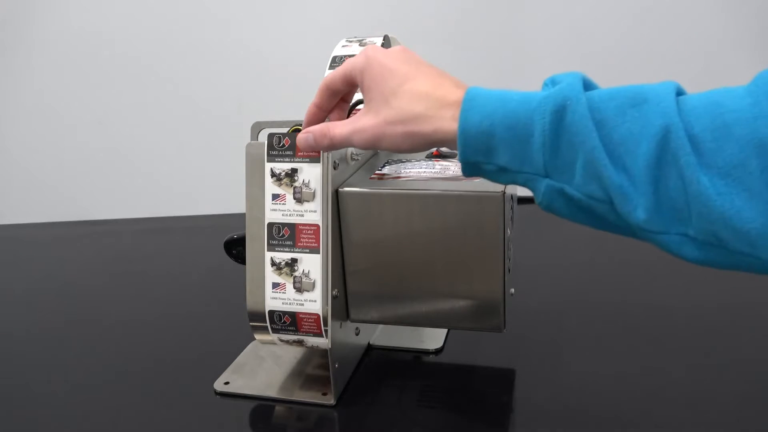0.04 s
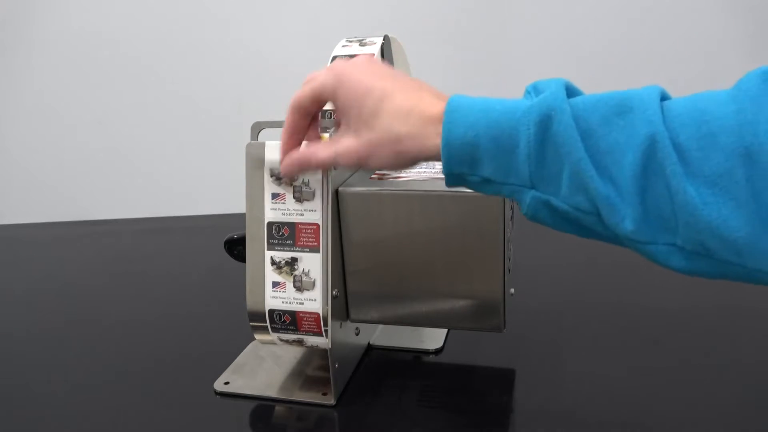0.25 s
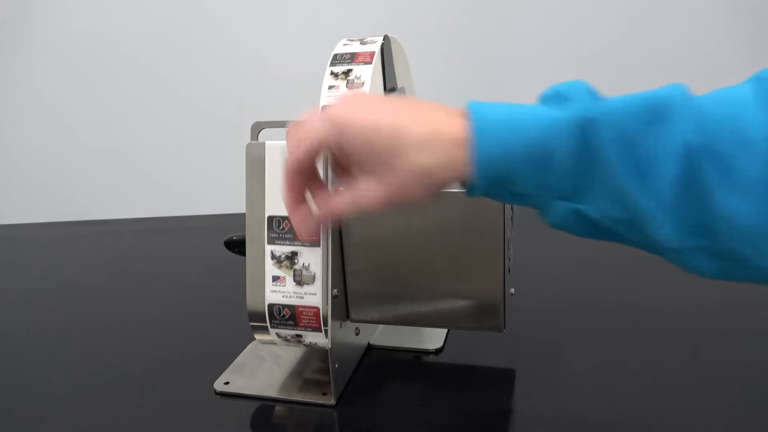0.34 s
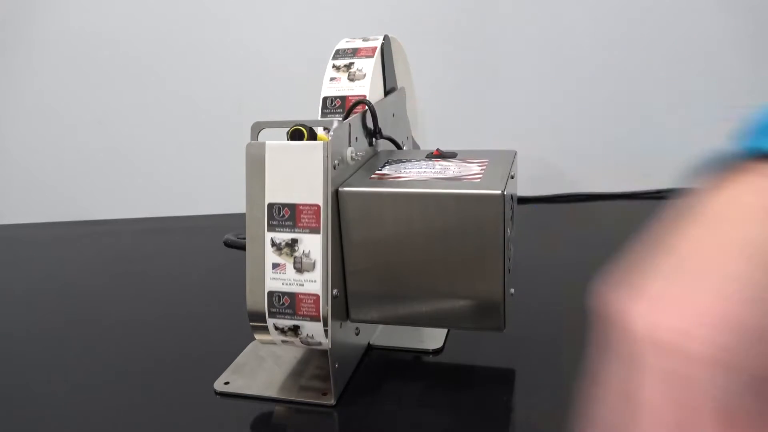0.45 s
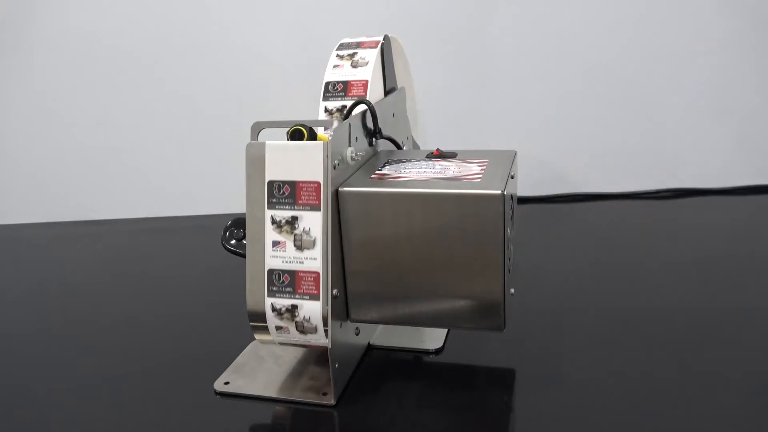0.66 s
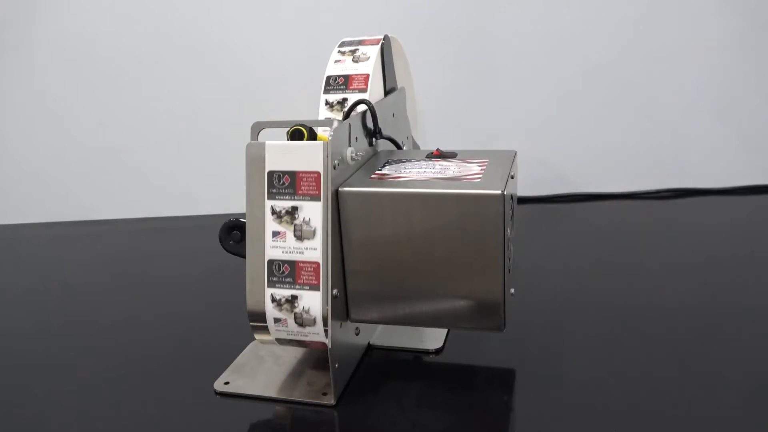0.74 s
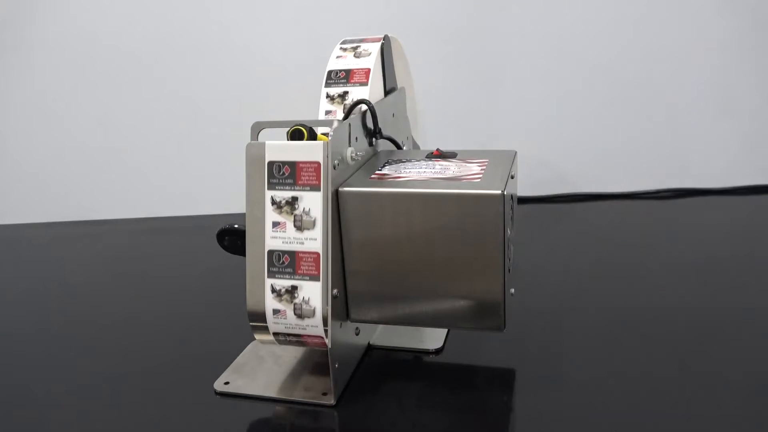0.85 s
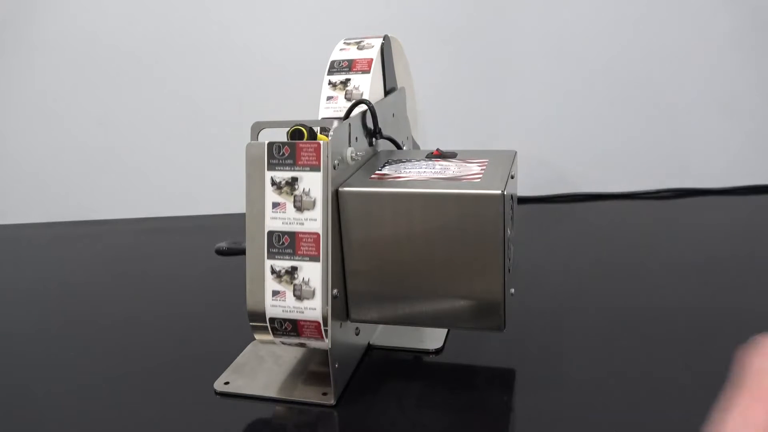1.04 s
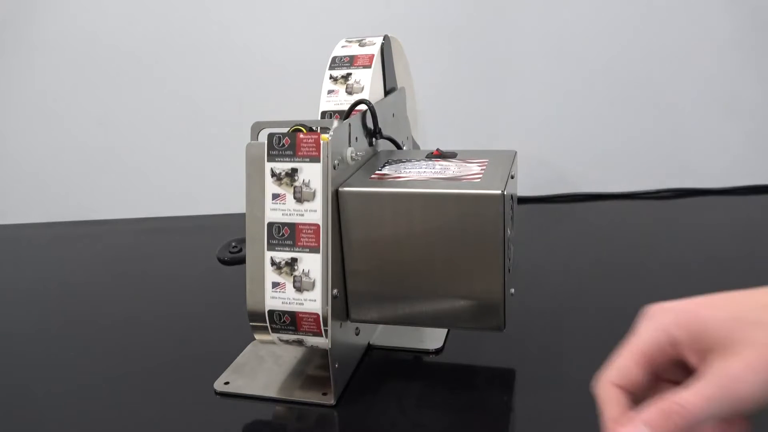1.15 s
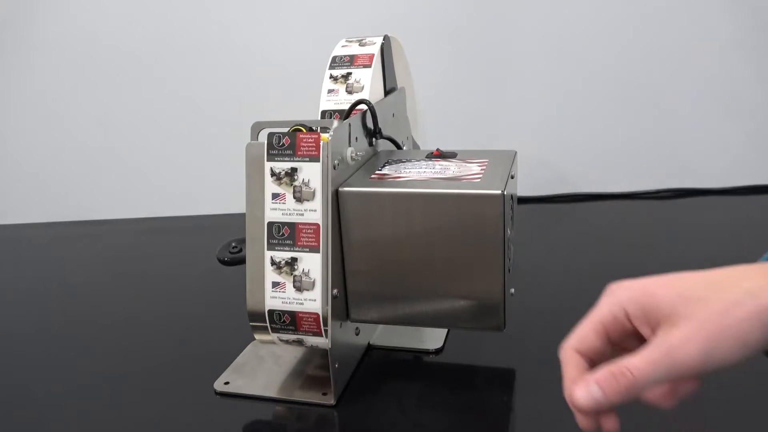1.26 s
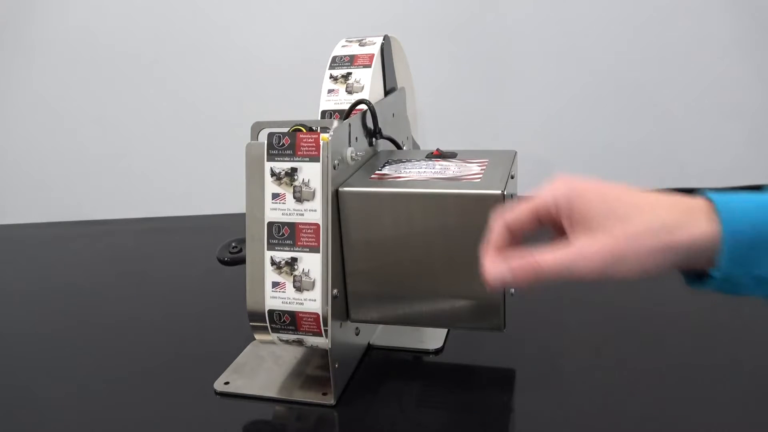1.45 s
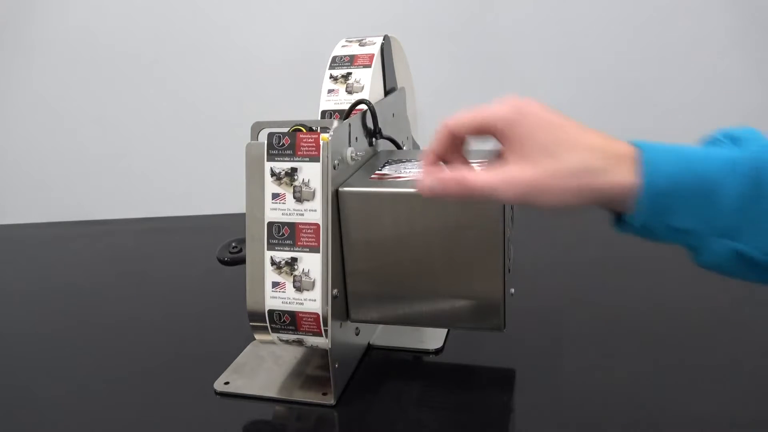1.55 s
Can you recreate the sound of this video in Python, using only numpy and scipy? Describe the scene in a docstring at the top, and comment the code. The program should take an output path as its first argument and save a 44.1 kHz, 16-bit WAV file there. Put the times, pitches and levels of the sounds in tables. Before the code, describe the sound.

In a quiet, slightly echoing room, a motorised label dispenser starts with a click, whirs with rapid ticking as it feeds the strip, then halts with a bouncing metallic clack. A sleeve rustles softly and a hand makes light ticks.

```python
"""A quiet, bare room with an electric label dispenser on a table.
A label is picked off, the mechanism clicks in and a small mains-powered gear motor whirs for
just under a second, ticking as it feeds the strip. It stops with a bouncing metal clack that
rings out in the room. A hand comes back with a sleeve rustle and a few light ticks."""
import sys
import numpy as np
from scipy import signal
from scipy.fft import rfft, irfft
from scipy.io import wavfile

SR = 44100
rng = np.random.default_rng(int(sys.argv[2]) if len(sys.argv) > 2 else 0)


def transcribe(signal):
    """Save signal, clipped to [-1, 1], as a 16-bit WAV file at the path in sys.argv[1]."""
    frames = np.atleast_2d(signal).T
    limited = np.clip(frames, -1, 1)
    pcm = np.round(limited * 32767).astype(np.int16)
    wavfile.write(sys.argv[1], SR, pcm)


N = 70560
T = np.arange(N) / SR

START_S, STOP_S = 0.219, 1.117  # the motor runs between these times
ROTOR_HZ, FIELD_HZ = 58.05, 120  # motor turns and magnetic pulses per second

# A fade time is how long a sound takes to drop 60 dB. A colour is its balance of lows and highs.
# how long the room echoes (frequency [Hz], fade time [s])
ROOM_FADE = [(150, 0.37), (400, 0.92), (1500, 0.68), (4500, 0.65), (8000, 0.4), (14000, 0.26)]
# stereo width (frequency [Hz], side level minus middle level [dB])
STEREO_WIDTH = [(60, -20), (220, -15.5), (450, -15), (800, -12), (1300, -23.5), (2400, -19.5),
                (4300, -20.5), (5800, -10), (8500, -7.5), (11000, -9.5), (11800, -38)]
# the room's quiet air (frequency [Hz], level [dB])
AIR_COLOUR = [(15, -16), (25, -11.5), (136, -9.5), (215, -14), (240, -15), (322, -7), (399, -15), (598, -8),
              (782, -15.5), (10900, -42.5), (15500, -39)]
# light ticks of the hand (time [s], level [dB], centre [Hz], drop away from the centre
# [dB per octave squared], fade time [s], left minus right [dB])
HAND_TICKS = [(0.045, -72.5, 6400, 26, 0.013, 0), (0.172, -70, 7000, 10, .03, -1),
              (1.3634, -29, 4850, 3.5, 0.003, -5.5), (1.4223, -37.5, 3160, 8, 0.013, -2),
              (1.4282, -42.5, 1480, 16, 0.019, 0.5), (1.4723, -48.5, 3080, 3.5, 0.023, -4),
              (1.479, -63, 10000, -1.5, 0.016, 0)]
# the broad noise under each of those ticks (frequency [Hz], level [dB])
TICK_BASE_COLOUR = [(200, -16), (600, -12.5), (7000, -15), (15000, -31)]
# how the sleeve rustle comes and goes (time [s], level [dB])
SLEEVE_LEVELS = [(.16, -100), (.18, -78.5), (.22, -70), (.3, -100), (1.28, -65), (1.35, -63), (1.41, -76),
                 (1.48, -59), (1.53, -68.5), (1.6, -78)]
# rustling cloth (frequency [Hz], level [dB])
SLEEVE_COLOUR = [(200, -41), (600, 4), (1500, 0.5), (4000, -14.5), (8000, -6.5), (15000, -16)]
# how the rasp comes and goes (time [s], level [dB])
RASP_LEVELS = [(.27, -73), (.33, -54.5), (.365, -54.5), (.41, -65), (.46, -57), (.62, -54), (.7, -60.5),
               (1.12, -57), (1.2, -76)]
# the rasp's narrow band near 3 kHz (frequency [Hz], level [dB])
RASP_COLOUR = [(2200, -45), (2700, -3), (2920, 4), (3150, 1.5), (3600, -39)]
# strip and gears scuffing as they speed up (frequency [Hz], level [dB])
SCUFF_COLOUR = [(100, -39), (200, -14), (280, -16), (460, -2.5), (650, -6), (950, -2), (1450, -14),
                (2230, -15), (2550, -7.5), (3200, -14.5), (4400, -10.5), (5400, -17), (6700, -10.5),
                (8500, -20.5), (12000, -20), (15500, -31)]
# ticks of the feed (frequency [Hz], level [dB])
FEED_COLOUR = [(1000, -1.5), (3000, -4), (5700, 6), (6600, 0), (7450, 7.5), (8100, -5), (8900, 2),
               (9700, -1.5), (10250, 5.5), (10900, -19), (15000, -30)]
# thin ring of the drive parts after each tick (frequency [Hz], level [dB], fade time [s])
DRIVE_RINGS = [(7340, -65, .25), (7600, -65, 0.23), (10250, -69, 0.11)]
# gear teeth meeting (frequency [Hz], level [dB])
GEAR_COLOUR = [(100, -20), (320, -16), (400, -11), (520, -11.5), (850, -17), (1180, -5), (1300, -9.5),
               (1490, -4.5), (1700, -14.5), (2050, -10.5), (2280, -18.5), (2600, -8), (2950, -11.5),
               (3400, -14.5), (4300, -14), (5200, -20), (6500, -21.5), (7450, -20.5), (8100, -24.5),
               (8900, -25.5), (9700, -31), (10250, -32.5), (10900, -28.5), (15500, -48)]
# mains hum of the motor's coil (frequency [Hz], level [dB])
HUM_TONES = [(60, -76.5), (120, -69.5), (360, -68.5), (480, -64.5), (600, -66.5), (720, -67)]
# pairs of whining tones (pitch [times the rotor speed], level [dB], higher partner's level [dB])
WHINE_TONES = [(14, -66, -76), (17, -63, -61), (18, -65, -56), (19, -62, -52.5), (20, -65, -66),
               (22, -63, -62), (23, -68, -62), (24, -66, -58), (25, -62, -65), (32, -64, -64),
               (40, -72, -69), (48, -68, -62), (70, -70, -70)]
# hits as the mechanism clicks in (time [s], level [dB])
CLICK_HITS = [(.2188, -45), (.2218, -32.5), (.2275, -39.5)]
# the crack of those hits (frequency [Hz], level [dB])
CLICK_COLOUR = [(200, -15), (400, -4), (700, -11), (1100, -0.5), (1750, 8), (2200, -5), (2700, 1),
                (3400, -1), (4400, 3), (5400, -3.5), (6500, 6), (8200, -5.5), (11000, 1), (15500, -8)]
# notes the click rings in the housing (frequency [Hz], level [dB], fade time [s])
HOUSING_RINGS = [(205, -60, .4), (373, -40, .42), (456, -41, .35), (473, -46, .45), (815, -57, .35),
                 (1478, -49, .25), (1770, -37, .06), (2596, -48, .26), (2908, -53, .3), (4344, -54, .31),
                 (6514, -56, .2)]
# the stopping clack and its bounces (time [s], level [dB])
CLACK_HITS = [(1.131, -31), (1.1335, -32), (1.1385, -37.5), (1.1418, -41), (1.152, -39), (1.1548, -33.5),
              (1.162, -35), (1.175, -43)]
# the crack of those hits (frequency [Hz], level [dB])
CLACK_COLOUR = [(150, -28), (400, -5.5), (700, -8), (1400, 0.5), (2100, -0.5), (2800, -3), (3300, -5.5),
                (4300, 3.5), (5500, 2), (6800, -2), (9000, 0), (10500, -7), (12500, -5.5), (15500, -17.5)]
# notes of the steel brake parts (frequency [Hz], level [dB], fade time [s])
BRAKE_RINGS = [(393, -52, 1.1), (495, -55, .9), (1604, -54, .8), (2159, -50, .41), (4065, -46, .5),
               (4346, -40, .3), (4621, -43, .38), (5325, -44, .2), (5809, -47, .45), (7154, -54, .5)]


def from_db(db):
    """Turn decibels into a number to multiply by."""
    return 10 ** (np.asarray(db) / 20)


def unit_level(x):
    """Scale a sound so its average strength (rms) is 1."""
    return x / np.sqrt(np.mean(x ** 2) + 1e-20)


def at_hz(points, hz):
    """Read between a table's rows, spacing the frequencies by octaves."""
    freqs, values = np.transpose(points)
    return np.interp(np.log(np.maximum(hz, 1)), np.log(freqs), values)


def colour(x, spectrum):
    """Give a steady sound its balance of lows and highs."""
    return irfft(rfft(x) * from_db(at_hz(spectrum, np.fft.rfftfreq(N, 1 / SR))), N)


def widen(mid, side, wider_db=0):
    """Make narrow stereo from two unrelated sounds."""
    return mid + from_db(wider_db) * colour(side, STEREO_WIDTH) * np.array([[1], [-1]])


def pan(db):
    """Make the left side this many dB louder than the right."""
    return from_db(np.array([[db], [-db]]) / 2)


def noise(spectrum, wider_db=0):
    """Stereo noise of a given colour, at strength 1."""
    return unit_level(colour(widen(*rng.standard_normal((2, N)), wider_db), spectrum))


def tone(phase):
    """A pure tone that the room brings to each ear a little differently."""
    return np.sin(phase) + 0.089 * np.sin(phase + 2 * np.pi * rng.random()) * np.array([[1], [-1]])


def drift(rate_hz):
    """A random wobble, roughly 1 in size."""
    points = rng.standard_normal(200)
    return np.interp(T * rate_hz, np.arange(len(points)), points)


def dying(s, fade_s):
    """Stay at 1 until time s, then fade away."""
    return np.exp(-np.log(1000) * np.maximum(T - s, 0) / fade_s)


def struck(s, fade_s):
    """Jump from silence to 1 at time s, then fade away."""
    return (T >= s) * dying(s, fade_s)


def running(rise_s):
    """The motor's loudness: it comes on, holds, and dies away in the room."""
    return (1 - np.exp(-np.maximum(T - START_S, 0) / rise_s)) * dying(STOP_S, fade_s=0.32)


def room_echo(x):
    """The bare room smears a sound into a tail; each band of pitch fades at its own rate."""
    white = rfft(widen(*rng.standard_normal((2, N))))
    hz = np.fft.rfftfreq(N, 1 / SR)
    edges = np.append(0, np.geomspace(200, SR / 2, 14))
    tail = 0
    for low, high in zip(edges, edges[1:]):
        band = irfft(white * (hz >= low) * (hz < high), N)
        tail = tail + band * dying(0, at_hz(ROOM_FADE, (low + high) / 2))
    tail = unit_level(tail * (1 - np.exp(-T / 0.0026))) / np.sqrt(N)
    return signal.fftconvolve(x.mean(axis=0)[None], tail, axes=1)[:, :N]


def room_air():
    """A faint, steady rush, a little to the left."""
    return from_db(-71) * pan(1.8) * noise(AIR_COLOUR)


def hand(wider_db=2.5, echo_db=-4):
    """A hand makes light ticks that echo in the room, and its sleeve rustles."""
    freqs = np.geomspace(100, 16000, 24)
    ticks = 0
    for s, db, centre_hz, drop_db, fade_s, pan_db in HAND_TICKS:
        curve_db = -drop_db * np.log2(freqs / centre_hz) ** 2
        spectrum = np.column_stack([freqs, np.maximum(curve_db, at_hz(TICK_BASE_COLOUR, freqs))])
        ticks = ticks + from_db(db) * pan(pan_db) * struck(s, fade_s) * noise(spectrum, wider_db)
    sleeve = from_db(np.interp(T, *np.transpose(SLEEVE_LEVELS))) * noise(SLEEVE_COLOUR, wider_db)
    return ticks + from_db(echo_db) * room_echo(ticks) + sleeve


def rasp():
    """A narrow rasp, perhaps the strip sliding over the edge that peels the labels."""
    level_db = np.interp(T, *np.transpose(RASP_LEVELS), left=-120, right=-120)
    return from_db(level_db) * noise(RASP_COLOUR)


def strip_feed(first_tick_s=0.3995, gap_s=0.05825, tick_db=-49, weak_db=-4.5):
    """The strip scuffs as it starts; then the drive ticks, strong and weak in turn, and rings."""
    scuff = from_db(-50) * (T > START_S) * dying(0.34, fade_s=0.28) * noise(SCUFF_COLOUR)
    ticks = rings = 0
    for k, s in enumerate(np.arange(first_tick_s, STOP_S, gap_s)):
        ticks = ticks + from_db(tick_db + weak_db * (k % 2) + rng.normal(0, 1)) * struck(s, 0.052)
        for hz, db, fade_s in DRIVE_RINGS:
            note = tone(2 * np.pi * (hz * T + rng.random()))
            rings = rings + from_db(db + rng.normal(0, 1.8)) * struck(s, fade_s) * note
    return scuff + ticks * noise(FEED_COLOUR) + rings


def gears(repeat_share=0.41, rise_db_per_s=3.5):
    """Teeth meet, partly the same way each turn, and throb with the rotor and the magnetic field."""
    one_turn = rng.standard_normal((2, int(SR / ROTOR_HZ)))
    looped = widen(*(np.resize(row, N) for row in one_turn))
    repeating = unit_level(colour(looped, GEAR_COLOUR))
    teeth = np.sqrt(repeat_share) * repeating + np.sqrt(1 - repeat_share) * noise(GEAR_COLOUR)
    throb = 1 + 0.1 * np.cos(2 * np.pi * ROTOR_HZ * T) + 0.083 * np.cos(2 * np.pi * FIELD_HZ * T)
    throb = np.where(T < STOP_S, throb, 1)
    level_db = -48 + rise_db_per_s * (np.minimum(T, STOP_S) - (START_S + STOP_S) / 2)
    return teeth * throb * from_db(level_db) * running(rise_s=0.054)


def motor(flutter=0.14, wander_hz=0.045, scatter_cycles=0.36):
    """The rotor whines; the pulsing field gives each tone a partner to beat with. The coil hums."""
    turns = np.cumsum(ROTOR_HZ + wander_hz * drift(7.97)) / SR
    whine = hum = 0
    for multiple, db, partner_db in WHINE_TONES:
        # the whine builds as the motor settles, the high tones later
        build_s = 0.27 if multiple * ROTOR_HZ > 1300 else 0.15
        build = from_db(-17 * np.exp(-np.maximum(T - START_S, 0) / build_s))
        for shift_hz, level_db in ((0, db), (FIELD_HZ, partner_db)):
            phase = 2 * np.pi * (multiple * turns + shift_hz * T + scatter_cycles * rng.random())
            note = tone(phase) * (1 + flutter * drift(14.7))
            pitch_wobble = flutter * drift(14.5) * np.cos(phase)
            whine = whine + build * from_db(level_db) * (note + pitch_wobble)
    for hz, db in HUM_TONES:
        note = tone(2 * np.pi * (hz * T + rng.random()))
        hum = hum + from_db(db) * note * (1 + flutter * drift(10.7))
    return np.sqrt(2) * (whine * running(rise_s=0.035) + hum * running(rise_s=0.096))


def metal_hits(hits, spectrum, notes, fade_s, echo_db, ring_db, swell_cycles=11):
    """Metal parts hit in a quick run: each hit cracks, echoes and sets the parts ringing."""
    def loudness(fade):
        return np.sqrt(sum((from_db(db) * struck(s, fade)) ** 2 for s, db in hits))

    crack = noise(spectrum) * loudness(fade_s)
    all_hits = np.sqrt(sum(from_db(db) ** 2 for _, db in hits))
    since_first_s = np.maximum(T - hits[0][0], 0)
    rings = 0
    for hz, db, ring_s in notes:
        cycles = hz * since_first_s
        swell = 1 - np.exp(-cycles / swell_cycles)
        note = tone(2 * np.pi * cycles) * (1 + 0.34 * drift(29.96))
        rings = rings + from_db(db) * loudness(ring_s) / all_hits * swell * note
    return crack + from_db(echo_db) * room_echo(crack) + from_db(ring_db) * rings


def scene():
    """Click, whir, clack and the hand, over the room's quiet air."""
    click = metal_hits(CLICK_HITS, CLICK_COLOUR, HOUSING_RINGS, fade_s=0.022, echo_db=-3, ring_db=-1)
    clack = metal_hits(CLACK_HITS, CLACK_COLOUR, BRAKE_RINGS, fade_s=0.037, echo_db=1.5, ring_db=-2)
    whir = motor() + gears() + strip_feed() + rasp()
    return click + whir + clack + hand() + room_air()


def record(dry, cutoff_hz=15800):
    """Cut away the very highest treble steeply."""
    return signal.sosfilt(signal.ellip(10, .2, 80, cutoff_hz, fs=SR, output="sos"), dry)


dry = scene()
out = record(dry)
transcribe(out)
```